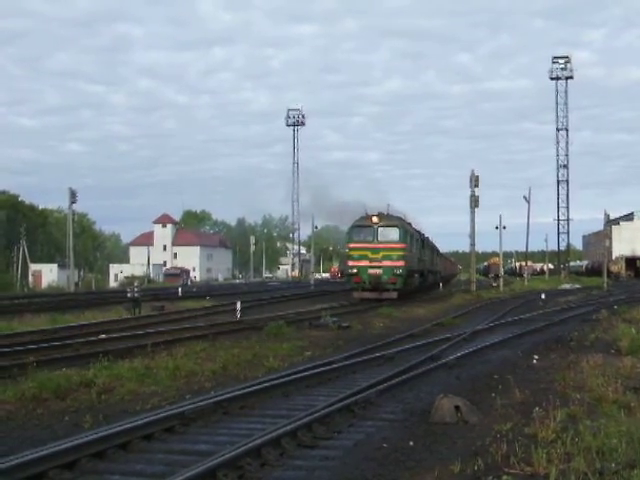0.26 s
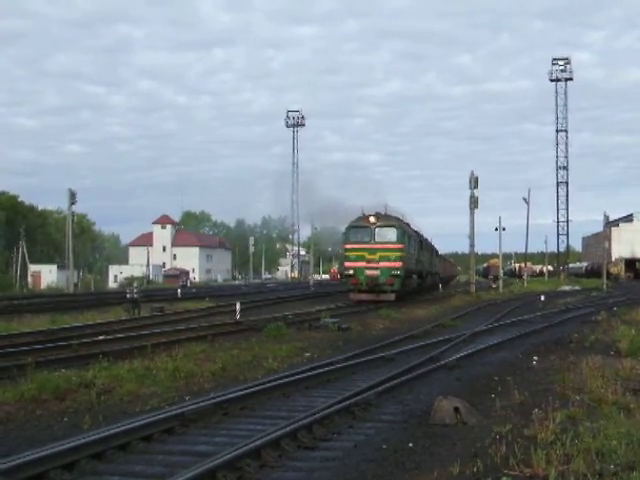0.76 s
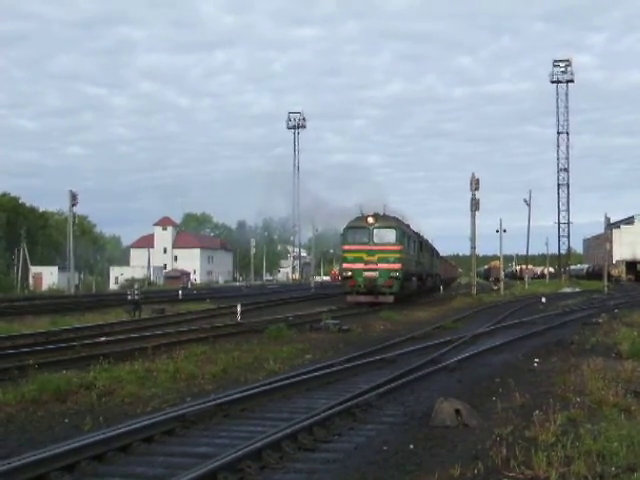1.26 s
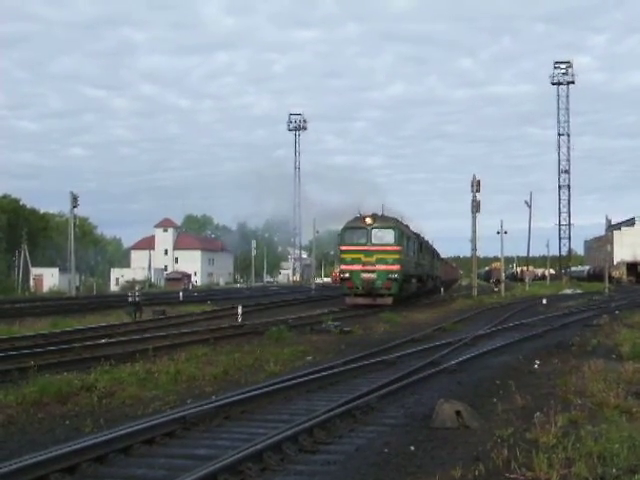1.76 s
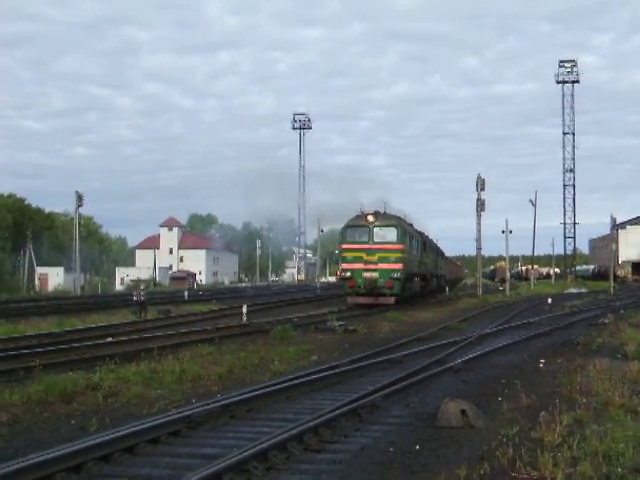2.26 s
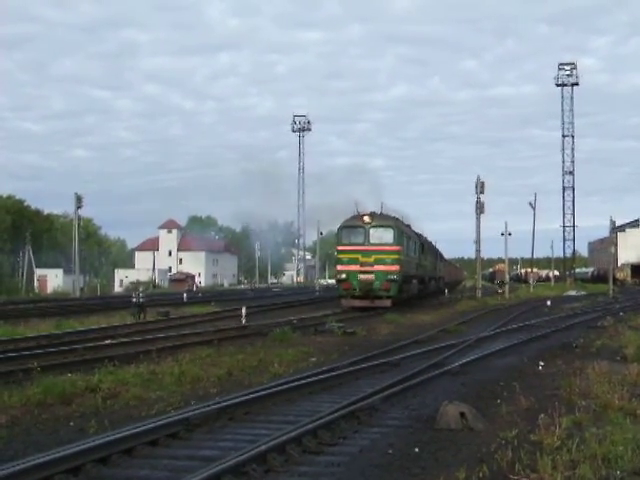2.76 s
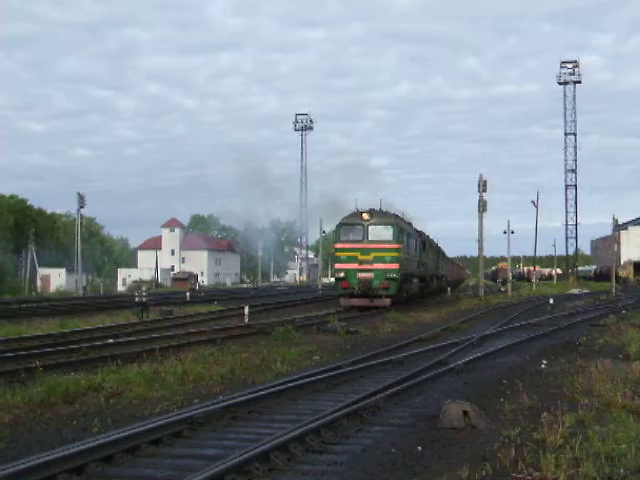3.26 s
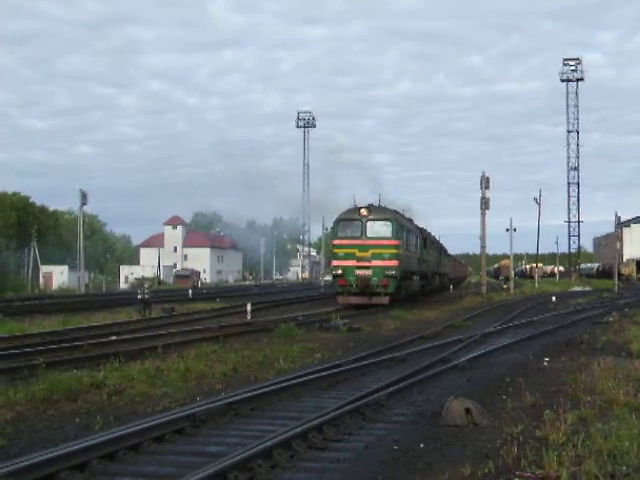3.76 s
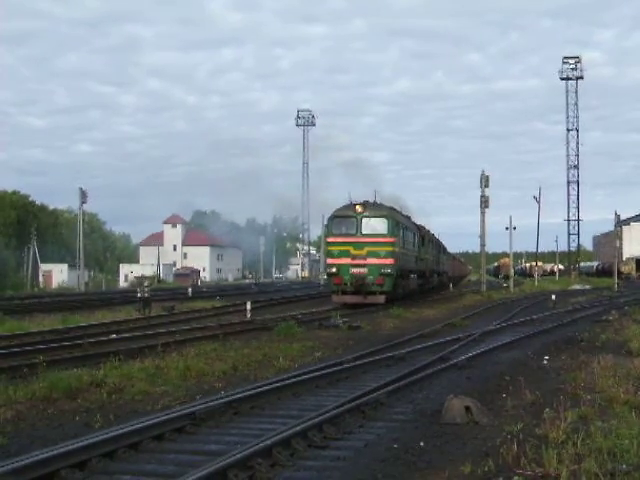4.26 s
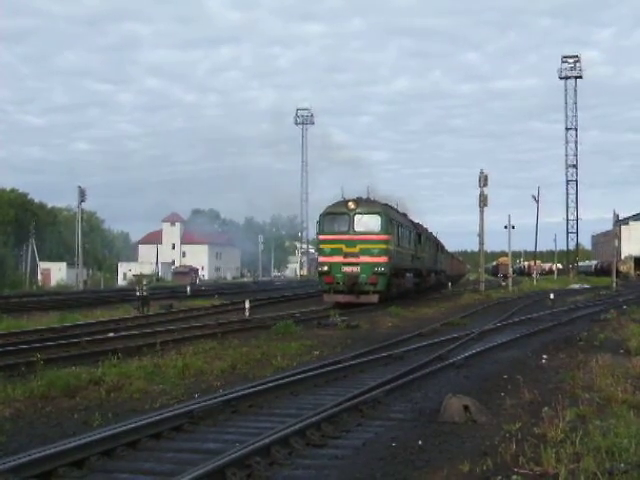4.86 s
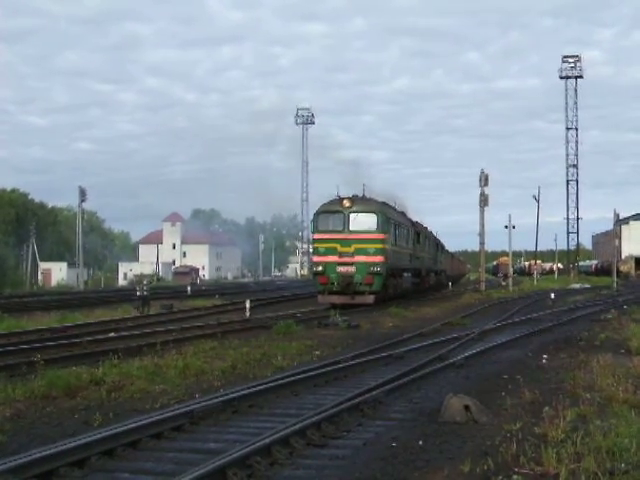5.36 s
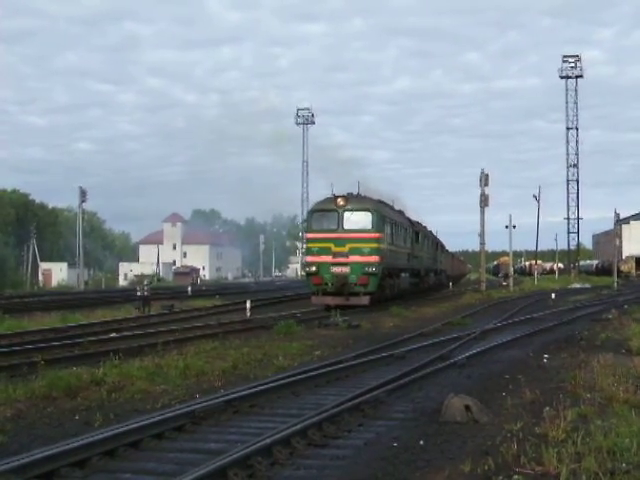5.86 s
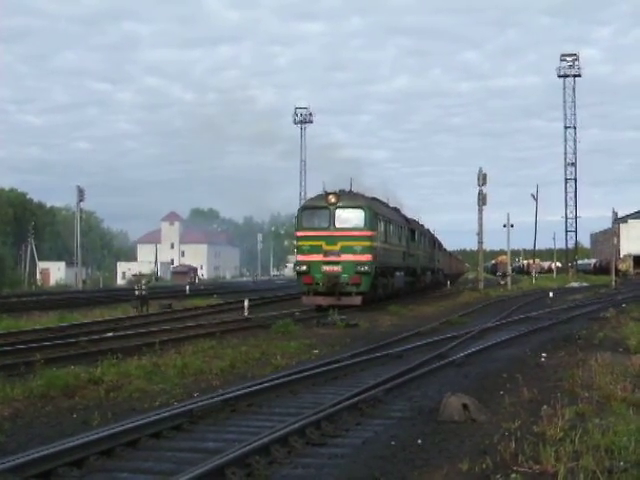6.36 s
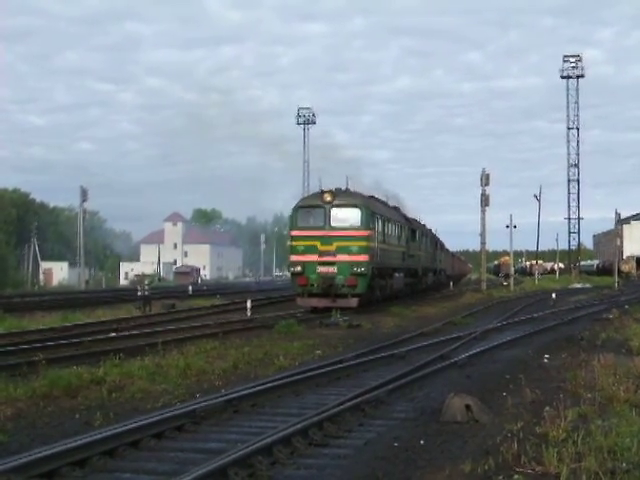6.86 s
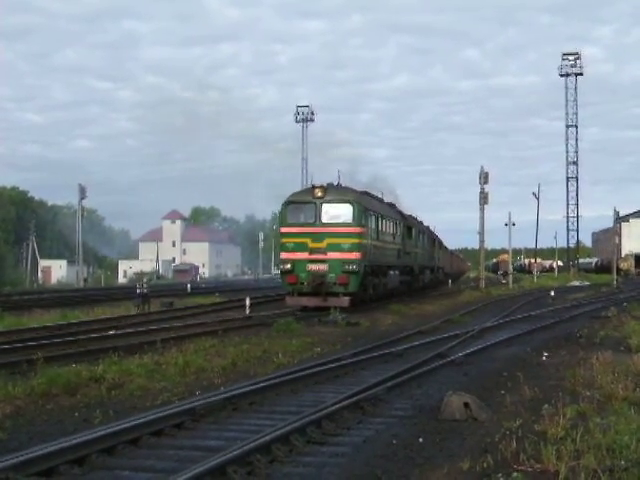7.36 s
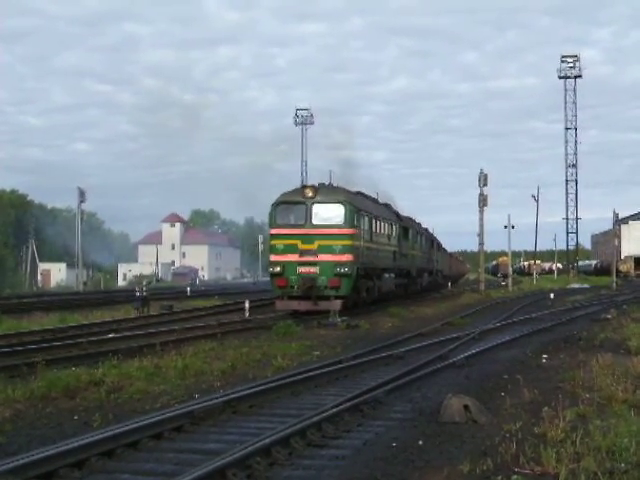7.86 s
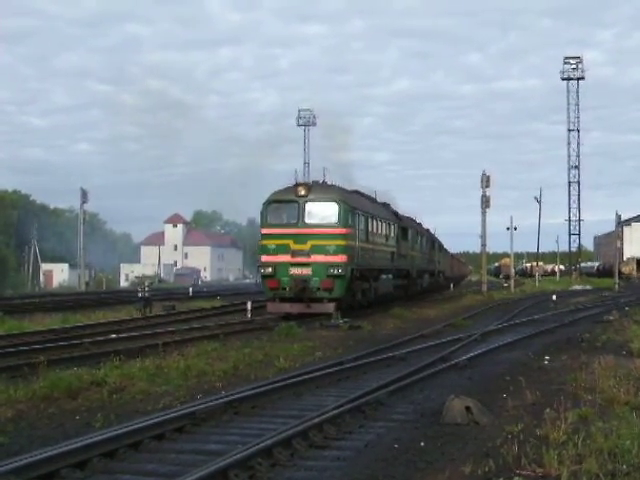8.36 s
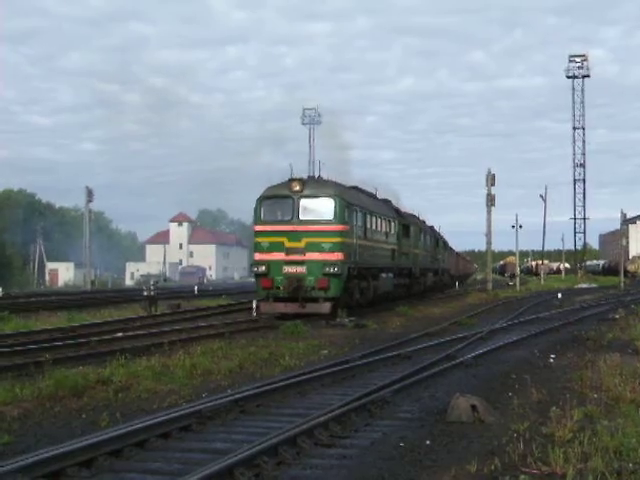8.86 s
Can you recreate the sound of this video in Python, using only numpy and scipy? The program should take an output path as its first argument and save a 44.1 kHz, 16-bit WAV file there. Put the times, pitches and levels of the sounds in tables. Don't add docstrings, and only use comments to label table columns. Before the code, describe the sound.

Heavy diesel locomotives drone and throb under load, slowly approaching outdoors, with roaring exhaust, wind bumps on the microphone and sharp handling clicks.

```python
import sys
import numpy as np
from scipy import signal
from scipy.fft import rfft, irfft, next_fast_len
from scipy.io import wavfile
from scipy.ndimage import uniform_filter1d

SR = 44100
rng = np.random.default_rng(int(sys.argv[2]) if len(sys.argv) > 2 else 0)


def ratio_of_db(decibels):
    return 10 ** (np.asarray(decibels, float) / 20)


def transcribe(signal):
    frames = np.atleast_2d(signal).T
    limited = np.clip(frames, -1, 1)
    pcm = np.round(limited * 32767).astype(np.int16)
    wavfile.write(sys.argv[1], SR, pcm)


N = 402191

# speed_turns_per_s, drift_turns_per_s2, hunt_swing_rad, hunt_hz, fastest_s
FRONT_CRANK = (6.8457, .001237, .1292, .8053, 3.5305)
REAR_CRANK = (6.6943, -.001642, .0836, .8077, 3.9804)
# order, front_db, rear_db, rear_lag_cycles (sets when the sections swell together)
STRONG_ORDERS = [(6, -29, -33.5, 0.0024), (8, -37, -38, -.26), (9, -24, -28.5, -0.39),
                 (10, -33.5, -41.5, -0.61), (11, -38, -37.5, 0.17), (15, -34.5, -38.5, -0.11)]
# order, front_db
WEAK_ORDERS = [(3, -44.5), (4, -43), (5, -51.5), (7, -49), (12, -50), (13, -37.5), (14, -43.5), (16, -39.5),
               (17, -44.5), (18, -42.5)]
# start_s, speed_turns_per_s
THIRD_SPEED = [(0, 7.4676), (1.5, 7.2384), (3, 7.1118), (4.5, 6.9772), (6, 6.87), (7.5, 6.8685),
               (9.2, 6.8835)]
THIRD_ORDERS = {6: (-34, 0.037), 8: (-45.5, -0.3), 9: (-29.5, -.39), 15: (-44.5, -.04)}
# start_s, gain_db
THIRD_PIPE = [(0, -7), (1.3, -5.5), (2.2, 0), (5, 0.5), (6.5, -0.5), (9.12, -1)]
BLOWER_RATIO = (25.872, 25.864)
# front_db, rear_db
BLOWER_DB = (-41, -45)
# start_s, pitch_hz, level_db
GEARS = [(0, 1350, -59), (2, 1360, -55), (5, 1378, -53), (7.5, 1400, -54), (8.4, 1410, -56),
         (9.12, 1415, -62)]
# start_s, pitch_hz, level_db
MOAN = [(7.9, 225, -47), (7.97, 220.6, -39.5), (8.5, 211, -52)]
# start_s, level_db
EFFORT = [(0, -40), (1.2, -39.5), (1.7, -38), (2.8, -40), (3.35, -38), (3.6, -38.5), (3.9, -41.5),
          (5.0, -39), (5.4, -39.5), (5.9, -38), (7.2, -37.5), (7.6, -39), (8.0, -37), (8.5, -39),
          (9.12, -37.5)]
# freq_hz, density_db_per_hz
ROAR_COLOUR = [(20, -18.5), (110, -21), (140, -26), (270, -27), (400, -30.5), (485, -39.5), (580, -30),
               (800, -33), (1010, -35.5), (1900, -38.5), (3400, -43), (5200, -50.5), (7400, -51.5),
               (8700, -59.5)]
# centre_hz, width_hz, level_db
BODY = [(687, 83, 1), (765, 48, -0.5), (1187, 140, -7), (1379, 100, -5), (3686, 160, -13),
        (385.5, 66, -3.5)]
# peak_s, change_db, release_s
DUCKS = [
    (3.63, -3, 0.31),
    (7.27, -4, .05),
    (8.435, -6, 0.06),
    (8.645, -5.5, 0.098),
]
# start_s, pitch_hz, level_db
SQUEAK = [(3.65, 4680, -60), (3.72, 4680, -52), (3.76, 4680, -44), (3.80, 4677, -47), (3.865, 4675, -48),
          (3.9, 4680, -62)]
# start_s, level_db
WIND = [(3.1, -44), (3.22, -31.5), (3.48, -42), (3.58, -29), (3.7, -39), (3.86, -28), (3.95, -41),
        (4.17, -35.5), (4.75, -46)]
# start_s, peak_db
THUMPS = [(3.238, -19), (3.5175, -11), (3.536, -12), (3.578, -22), (3.615, -15), (3.6205, -10),
          (3.651, -15), (3.738, -16), (3.813, -14), (3.822, -18), (3.865, -8.5), (4.168, -14), (4.42, -21),
          (4.643, -19), (6.209, -19)]
# start_s, peak_db, ring_hz
TICKS = [(1.2602, -17, 6840), (1.3158, -20.5, 6770), (1.3364, -30.5, 6830), (1.347, -25, 6860),
         (1.364, -26.5, 6440), (1.3864, -32.5, 5760), (1.4366, -26.5, 7140), (1.4454, -18, 6750),
         (1.502, -22.5, 6800), (1.5063, -27.5, 5520), (1.5274, -33, 6640), (1.5355, -27.5, 6900),
         (1.5515, -27, 5570), (1.6114, -30.5, 6230), (1.623, -22.5, 6500), (2.256, -36, 7600),
         (3.567, -35, 6900), (6.0786, -30.5, 7650), (6.6685, -14.5, 7350), (6.6922, -17, 7206),
         (6.6969, -18, 5970), (6.7058, -19.5, 6800), (6.744, -27.5, 5720), (6.847, -26, 6300),
         (7.2512, -30.5, 7830), (7.326, -27.5, 7094), (7.354, -21.5, 7340), (8.022, -32.5, 7500),
         (8.0785, -32, 6800), (8.522, -30.5, 7400)]
# start_s, peak_db
DULL_TICKS = [(1.2607, -31), (1.365, -28), (1.4455, -28), (1.552, -27), (6.6922, -29)]
# start_s, peak_db, low_hz, high_hz, high_db, rattle_s
KNOCKS = [
    (6.2665, -16.5, 2100, 3800, 1, .007),
    (6.667, -17, 2100, 3700, 4, .0075),
    (6.7053, -11, 1350, 2900, -4, .001),
]
# start_s, length_s, start_db, change_db
RUSTLE = [(1.255, .382, -44.5, -0.5), (6.081, .125, -43.5, -7), (6.672, 0.024, -36.5, -3.5),
          (6.701, .022, -35.5, 0), (6.722, .06, -43, -9.5), (7.329, .04, -44, 5), (7.363, .04, -38, -9),
          (7.947, .19, -48, -7), (8.51, .05, -41.5, -18), (8.75, .37, -53, -1.5)]
# pitch_hz, level_db
WHINE = [(7300, -69), (7677, -66.5), (7708, -67.5), (8292, -73), (8322, -72)]
# start_s, pitch_hz, level_db
BIRDS = [
    [(6.485, 4000, -56), (6.51, 4200, -50), (6.545, 4320, -51), (6.575, 3980, -52)],
    [(6.735, 4450, -51), (6.755, 4420, -49), (6.775, 4000, -57)],
    [(6.885, 4000, -57), (6.91, 4240, -50), (6.93, 4000, -57)],
    [(6.945, 4600, -53), (6.962, 4350, -43), (6.985, 3970, -52)],
]

SURGE_DB, SURGE_LAG_S, APPROACH_DB_PER_S = .5, .1, .22
BLOWER_LAG_CYCLES = .19
PIPE_SPREAD_RAD = 1.2
HOLLOW_STEADY = .8
PUSH_S = .00162
TICK_SWELL_S, DULL_SWELL_S, TICK_KNOCK_DB = .0011, .0014, -12
HIT_T_S = np.arange(2000) / SR


def level(x, db):
    return x * ratio_of_db(db) / np.sqrt(np.mean(x ** 2))


def peak(x):
    return x / abs(x).max()


def band(x, hz, width_hz):
    edges_hz = np.clip([hz - width_hz / 2, hz + width_hz / 2], 5, .45 * SR)
    return signal.sosfilt(signal.butter(2, edges_hz, "band", fs=SR, output="sos"), x)


def noise_band(hz, width_hz):
    return level(band(rng.standard_normal(N), hz, width_hz), 0)


def walk(rate_hz):
    k = int(SR / rate_hz)
    held = np.repeat(rng.standard_normal(N // k + 1), k)
    return 1.23 * uniform_filter1d(uniform_filter1d(held, k), k)[:N]


def curves(table):
    s, *columns = np.transpose(table)
    t = np.arange(N) / SR
    fade = np.minimum(t - s[0], s[-1] - t) / .004
    gate = np.clip(fade + (s[0] == 0) + (s[-1] > 9.1) * (t > s[0] + .1), 0, 1)
    return [np.interp(t, s, c) for c in columns] + [gate]


def tone(table):
    hz, db, gate = curves(table)
    out, on = np.zeros(N), gate > 0
    phase = 2 * np.pi * np.cumsum(hz[on]) / SR
    out[on] = np.sqrt(2) * gate[on] * ratio_of_db(db[on]) * np.sin(phase)
    return out


def add(out, s, x):
    i = int(s * SR)
    out[i:i + len(x)] += x[:N - i]


def hump(swell_s):
    u = HIT_T_S / swell_s
    return u * np.exp(1 - u)


def crank(speed, drift, swing_rad, hunt_hz, fastest_s):
    s = np.arange(N) / SR
    hunt = 2 * np.pi * hunt_hz * (s - fastest_s)
    surge_db = SURGE_DB * np.cos(hunt - 2 * np.pi * hunt_hz * SURGE_LAG_S)
    approach_db = APPROACH_DB_PER_S * (s - s.mean())
    angle = 2 * np.pi * (speed * s + drift * s ** 2 / 2) + swing_rad * np.sin(hunt)
    return angle, ratio_of_db(surge_db + approach_db)


def drone():
    front, front_gain = crank(*FRONT_CRANK)
    rear, rear_gain = crank(*REAR_CRANK)
    third = 2 * np.pi * np.cumsum(curves(THIRD_SPEED)[0]) / SR
    pipe_db = curves(THIRD_PIPE)[0]
    ahead = ratio_of_db(BLOWER_DB[0]) * np.sin(BLOWER_RATIO[0] * front)
    behind = ratio_of_db(BLOWER_DB[1]) * np.sin(BLOWER_RATIO[1] * rear + 2 * np.pi * BLOWER_LAG_CYCLES)
    beside = np.zeros(N)
    for k, front_db, rear_db, lag in STRONG_ORDERS:
        k = round(k)
        spread = PIPE_SPREAD_RAD * k ** 2
        ahead += ratio_of_db(front_db) * np.sin(k * front + spread)
        behind += ratio_of_db(rear_db) * np.sin(k * rear + spread + 2 * np.pi * lag)
        if k in THIRD_ORDERS:
            db, lag = THIRD_ORDERS[k]
            gain = ratio_of_db(db + (pipe_db if k == 9 else 0))
            beside += gain * np.sin(k * third + spread + 2 * np.pi * lag)
    for k, db in WEAK_ORDERS:
        k = round(k)
        front_phase, rear_phase = rng.uniform(0, 2 * np.pi, 2)
        ahead += ratio_of_db(db) * np.sin(k * front + front_phase)
        behind += ratio_of_db(db - 7.5) * np.sin(k * rear + rear_phase)
    return np.sqrt(2) * (front_gain * ahead + rear_gain * behind + beside)


def roar():
    effort_db, _ = curves(EFFORT)
    s = np.arange(N) / SR
    duck_db = sum(d * (s > at) * np.exp(-np.abs(s - at) / release) for at, d, release in DUCKS)
    db = effort_db + duck_db
    hollow_db = -HOLLOW_STEADY * duck_db
    wide, shared = np.zeros(N), walk(3.03)
    for hz in 25 * 2 ** np.arange(0, 8.7, .5):
        hollow_share = np.clip(np.log2(1100 / hz), 0, 1)
        hiss_share = np.clip(np.log2(hz / 4500) * 2, 0, 1)
        gain_db = hollow_share * hollow_db - .22 * hiss_share * (db - db.mean())
        gain_db = gain_db + .3 * shared + 1.13 * walk(12)
        wide += ratio_of_db(gain_db) * np.sqrt(hz) * noise_band(hz, .32 * hz)
    colour_hz, colour_db = np.transpose(ROAR_COLOUR)
    size = 2 * next_fast_len(N // 2 + 1)
    log_hz = np.log(np.arange(1, size // 2 + 2) * SR / size)
    colour = ratio_of_db(np.interp(log_hz, np.log(colour_hz), colour_db))
    wide = irfft(rfft(wide, size) * colour, size)[:N]
    wide = wide / np.std(band(wide, 2700, 3400))
    body = np.zeros(N)
    for hz, width_hz, body_db in BODY:
        body += ratio_of_db(body_db + (hz < 1000) * hollow_db + 1.5 * walk(6)) * noise_band(hz, width_hz)
    return ratio_of_db(db) * (ratio_of_db(-.5) * wide + ratio_of_db(-6) * body)


def running_gear():
    gears = tone(GEARS) * (1 + .8 * walk(25))
    return gears + tone(MOAN) + tone(SQUEAK)


def wind():
    db, gate = curves(WIND)
    turbulence = rng.standard_normal(N) * ratio_of_db(5.1 * walk(40))
    out = gate * ratio_of_db(db) * level(band(turbulence, 187, 220), 0)
    u = np.arange(int(8 * PUSH_S * SR)) / SR / PUSH_S - 2
    width = np.where(u < .5, 1, .42)
    push = np.exp(-((u - .5) / width) ** 2)
    suction = np.exp(-(u - 1.7) ** 2)
    for s, peak_db in THUMPS:
        add(out, s, ratio_of_db(peak_db) * (push - .7 * suction))
    return out


def ticks():
    out = np.zeros(N)
    for s, db, ring_hz in TICKS:
        burst = rng.standard_normal(len(HIT_T_S)) * hump(TICK_SWELL_S)
        snap = peak(band(burst, 7000, 3800))
        ring = peak(band(burst, ring_hz, 830))
        low = peak(band(burst, 3000, 1600))
        add(out, s, ratio_of_db(db) * (peak(snap + .88 * ring) + ratio_of_db(TICK_KNOCK_DB) * low))
    for s, db in DULL_TICKS:
        burst = rng.standard_normal(len(HIT_T_S)) * hump(DULL_SWELL_S)
        add(out, s, ratio_of_db(db) * peak(band(burst, 3200, 900)))
    return out


def knocks():
    out = np.zeros(N)
    for s, db, low_hz, high_hz, high_db, rattle_s in KNOCKS:
        swell = np.abs(np.sin(np.pi * np.clip(HIT_T_S / rattle_s, 0, 1))) ** .6
        rattle = rng.standard_normal(len(HIT_T_S)) * swell
        low = peak(band(band(rattle, low_hz, 1300), low_hz, 1300))
        high = peak(band(band(rattle, high_hz, 1100), high_hz, 1100))
        crack = peak(band(band(rattle, 2900, 4200), 2900, 4200))
        add(out, s, ratio_of_db(db) * peak(low + ratio_of_db(high_db) * high + .8 * crack))
    return out


def rustle():
    grains = rng.standard_normal(N) * ratio_of_db(4 * walk(300))
    hiss = level(band(grains, 6650, 2900), 0)
    out = np.zeros(N)
    for s, length_s, start_db, change_db in RUSTLE:
        db, gate = curves([(s, start_db), (s + length_s, start_db + change_db)])
        out += gate * ratio_of_db(db) * hiss
    return out


def whine():
    s = np.arange(N) / SR
    return sum(np.sqrt(2) * ratio_of_db(db + 1.1 * walk(5.3)) * np.sin(2 * np.pi * hz * s) for hz, db in WHINE)


def birds():
    return sum(tone(note) for note in BIRDS)


def scene():
    train = drone() + roar() + running_gear()
    camera = ticks() + knocks() + rustle() + whine()
    return (train + wind() + camera + birds())[None]


def top_cut(x):
    return signal.sosfilt(signal.butter(12, 8990, fs=SR, output="sos"), x)


def record(dry):
    dipped = dry - .35 * signal.lfilter(*signal.iirpeak(8060, 22, SR), dry)
    low_pass = signal.cheby2(10, 45, 9300, fs=SR, output="sos")
    mix = signal.sosfilt(low_pass, dipped) - .0024
    return top_cut(mix)


dry = scene()
out = record(dry)
transcribe(out)
```